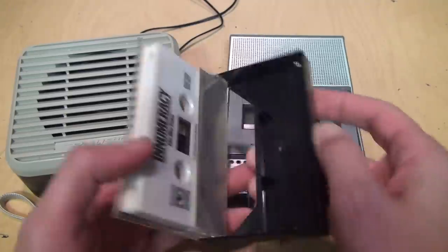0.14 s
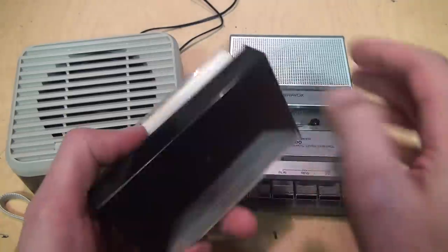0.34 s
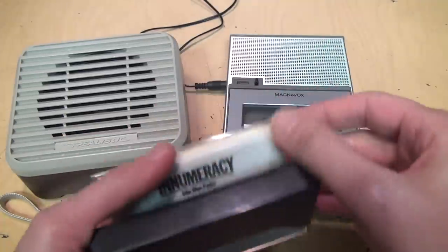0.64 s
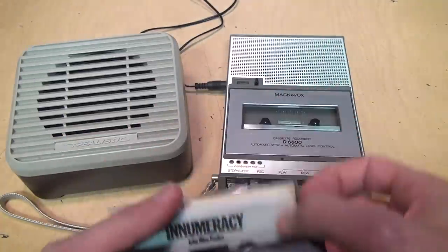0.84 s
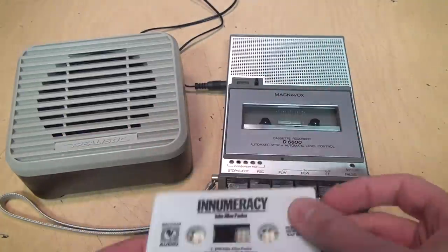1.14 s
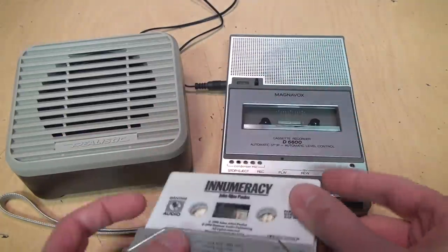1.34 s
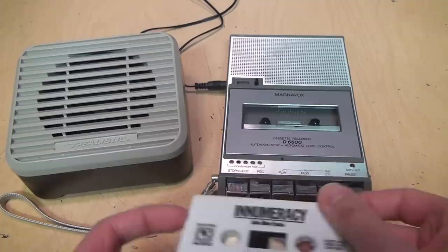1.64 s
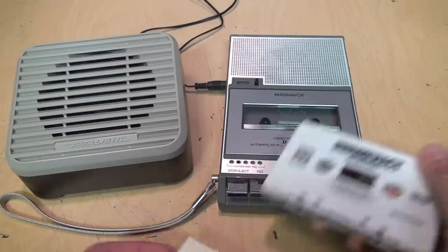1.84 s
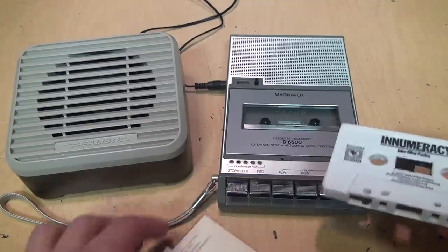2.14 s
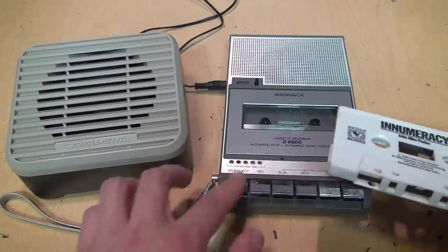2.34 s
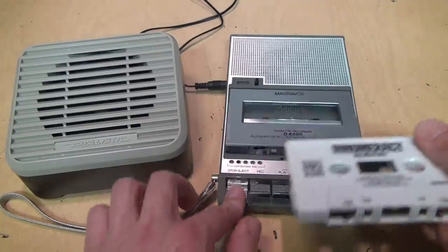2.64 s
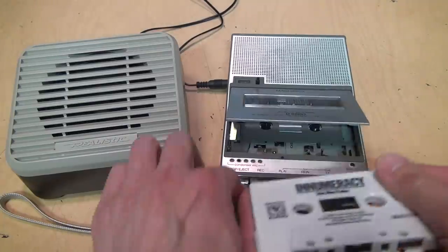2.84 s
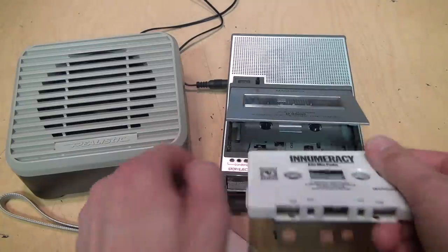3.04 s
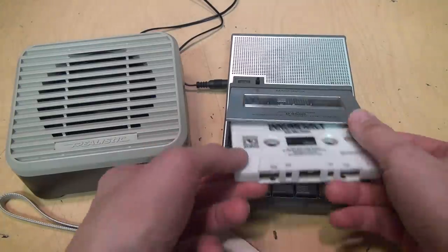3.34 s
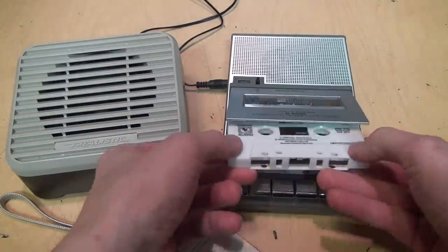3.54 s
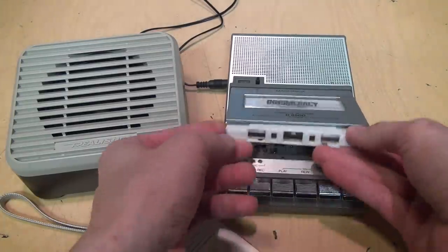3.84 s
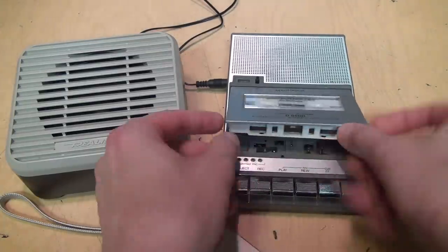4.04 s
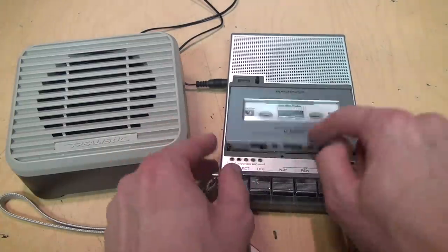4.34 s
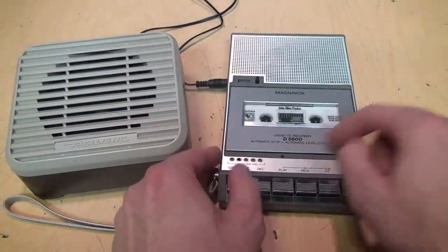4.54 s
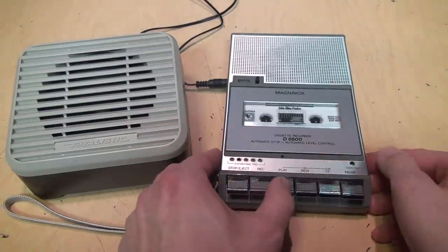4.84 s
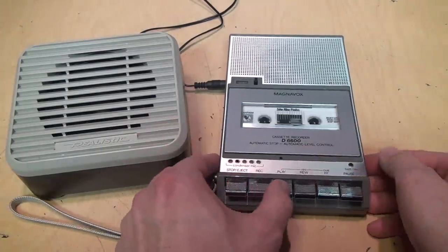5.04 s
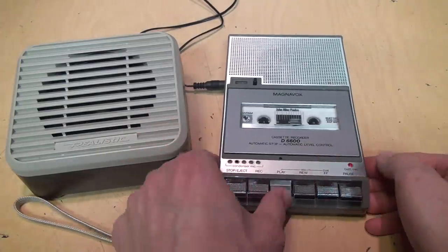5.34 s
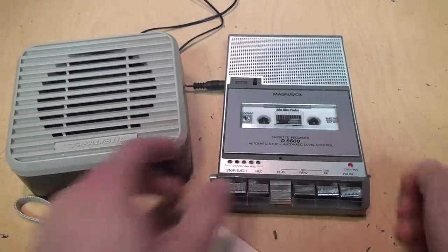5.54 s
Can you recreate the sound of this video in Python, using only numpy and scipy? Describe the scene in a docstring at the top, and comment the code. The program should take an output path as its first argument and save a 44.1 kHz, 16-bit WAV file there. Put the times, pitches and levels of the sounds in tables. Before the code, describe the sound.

A plastic cassette rattles out of its case, the case clatters onto a table, then a player is opened, loaded, shut and a key pressed.

```python
"""Hands click and rattle a tape cassette out of its plastic case, then drop the case on the table. They open a
portable deck, clatter the cassette in, shut the lid and press a key; springs in the deck ring on faintly.
Contacts are lumpy noise bursts through shell resonances, slides are grainy noise with dry ticks on top,
springs and table pushes are dying sines. Filtered noise and two low tones make the air of a small quiet
room from start to end, heard by a microphone close above the table."""
import sys
import numpy as np
from scipy import signal
from scipy.fft import rfft, irfft, next_fast_len
from scipy.io import wavfile
from scipy.ndimage import uniform_filter1d, map_coordinates

SR = 44100
rng = np.random.default_rng(int(sys.argv[2]) if len(sys.argv) > 2 else 0)


def waveform_to_disk(signal):
    """Save audio, clipped to [-1, 1], as 16-bit WAV at the path in sys.argv[1]."""
    frames = np.transpose(np.atleast_2d(signal))
    scaled = np.clip(frames, -1, 1) * 32767
    samples = np.round(scaled).astype(np.int16)
    wavfile.write(sys.argv[1], SR, samples)


N = 250247

# resonances of the thin case and cassette shells: [f/Hz, width/Hz, relative level/dB]
CASE_MODES = [(308, 280, -14), (1263, 368, 3), (1680, 370, 5), (2326, 870, 2.5), (3550, 790, 2),
              (4410, 700, 0.5), (5880, 1200, -6)]
# resonances of the deck's housing and lid: [f/Hz, width/Hz, relative level/dB]
DECK_MODES = [(223, 33, 8.5), (290, 37, 4.5), (808, 90, 17.5), (1120, 150, 17), (1520, 1140, 16),
              (1998, 704, 18.5), (3100, 4000, 11), (4647, 830, 16.5), (5000, 890, 10.5)]
# plastic and fingers sliding on plastic: [start/s, end/s, level/dB]
SLIDES = [(0, 0.038, -34), (0.11, 0.403, -45), (0.43, 0.51, -48.5), (0.564, 0.63, -49), (0.666, 1.121, -58),
          (0.8, 0.827, -45.5), (0.916, 0.956, -42), (0.967, 1.007, -48), (1.094, 1.165, -40.5),
          (1.159, 1.345, -42.5), (1.346, 1.426, -53), (1.432, 1.47, -36.5), (1.506, 1.67, -39),
          (1.654, 1.839, -37.5), (1.831, 1.93, -51.5), (1.921, 1.992, -41.5), (1.994, 2.108, -39.5),
          (2.092, 2.272, -32.5), (2.492, 2.616, -58), (2.691, 2.854, -53.5), (2.961, 3.108, -64.5),
          (3.269, 3.34, -61.5), (3.425, 3.473, -57.5), (3.564, 3.78, -53), (3.775, 3.87, -50),
          (3.899, 4.013, -37), (3.994, 4.109, -49.5), (4.024, 4.06, -36), (4.223, 4.287, -64),
          (4.375, 4.432, -21.5), (4.402, 4.491, -49), (4.948, 5.107, -65.5), (5.206, 5.308, -44),
          (5.44, 5.532, -47.5), (5.547, 5.602, -50.5)]
CASE_DOWN_S = 2.4  # from here on the hands work at the deck


def amp(db):
    """Decibels to an amplitude factor."""
    return 10 ** (np.asarray(db) / 20)


def unit(x):
    """Scale to an rms of one."""
    return x / np.sqrt(np.mean(x ** 2) + 1e-20)


def peak_unit(x):
    """Scale to a peak of one."""
    return x / np.abs(x).max()


def along(points, hz):
    """Interpolate (f/Hz, value) points on a log frequency axis."""
    f, v = np.transpose(points)
    return np.interp(np.log(hz + 1), np.log(f + 1), v)


def filtered(x, response):
    """Multiply the spectrum of x by a response of frequency."""
    m = next_fast_len(x.shape[-1] + 4096)
    spectrum = rfft(x, m) * response(np.fft.rfftfreq(m, 1 / SR))
    return irfft(spectrum, m)[..., :x.shape[-1]]


def body(modes):
    """The causal response of a few resonances, summed with alternating sign."""
    def response(f):
        total = 0
        for k, (centre, width, db) in enumerate(modes):
            damping = 1j * f * width
            total = total + (-1) ** k * amp(db) * damping / (centre * centre - f * f + damping)
        return total
    return response


def edge(hz):
    """The brittle treble of hard edges."""
    # brightness of sharp plastic edges: [f/Hz, level/dB]
    edge_curve = [(600, -79), (3000, -11), (5000, -8), (7500, -6.5), (11000, -12), (15000, -25.5)]
    return amp(along(edge_curve, hz))


def favoured(modes, centre_hz):
    """The place of contact favours the modes near one pitch, a little differently each time."""
    struck = []
    for hz, width, level in modes:
        octaves = np.log2(hz / centre_hz)
        lift_db = 9 * np.exp(-(octaves / .5) ** 2)
        struck.append((hz, width, level + lift_db + rng.normal(0, 2)))
    return struck


def hits(rows, modes, t60):
    """Each contact is a lumpy burst of micro-impacts dying away, heard through the shell and off the edges."""
    graze, graze_s = 0.22, .0015  # the touch before a contact: size, rise time constant
    edge_t60_s = 0.083  # extra decay that makes the edges die sooner
    out, lead = np.zeros(N + SR), SR // 250
    t = (np.arange(SR // 5) - lead) / SR
    # surfaces graze for an instant before they meet squarely
    shape = np.where(t < 0, graze * np.exp(t / graze_s), amp(-60 * t / max(t60, graze_s)))
    for s, db, centre_hz, edge_db in rows:
        lumps = amp(2.5 * map_coordinates(rng.standard_normal(200), [(t + .01) * 500]))
        shell_burst, edge_burst = rng.standard_normal((2, len(t))) * lumps * shape
        response = body(favoured(modes, centre_hz))
        # two gentle low-passes at 5 kHz leave the top treble to the edges
        shell = filtered(shell_burst, lambda f: response(f) / (1 + 1j * f / 5000) ** 2)
        edges = filtered(edge_burst * amp(-60 * t / edge_t60_s), edge)
        sound = peak_unit(shell) + amp(edge_db) * peak_unit(edges)
        out[round(s * SR):][:len(t)] += amp(db) * sound
    return out[lead:][:N]


def air():
    """Room tone: steady noise of one colour, independent in mid and side."""
    # colour of the room tone: [f/Hz, relative level/dB]
    air_colour = [(47, -28), (80, -2), (331, -8), (718, -8.5), (839, -3), (1200, -3), (1670, -9.5),
                  (2490, -12), (9400, -20.5), (16000, -22)]
    level_db = -61  # rms, before the side filter and the microphone
    noise = rng.standard_normal((2, N))
    return amp(level_db) * unit(filtered(noise, lambda hz: amp(along(air_colour, hz))))


def hum():
    """A faint low drone in the building: two sines that throb together."""
    # drone tones: [f/Hz, rms level before the microphone/dB]
    drone_tones = [(50.15, -71), (59.1, -74)]
    t = np.arange(N) / SR
    return sum(np.sqrt(2) * amp(db) * np.sin(2 * np.pi * (hz * t + rng.random())) for hz, db in drone_tones)


def room(x):
    """Noise as the room's answer, each frequency dying at its own speed."""
    # reverberation: [f/Hz, t60/s]
    decay_times = [(300, 0.28), (2000, 0.14), (6000, 0.095), (12000, 0.084)]
    hz, t, z = signal.stft(rng.standard_normal(SR // 3), SR, nperseg=256)
    decay = amp(-60 * t / along(decay_times, hz)[:, None])
    tail = signal.istft(z * decay, SR, nperseg=256)[1]
    delayed = np.pad(x, (150, 0))  # samples before the first reflection
    return signal.fftconvolve(delayed, tail / np.linalg.norm(tail))[:N]


def patchy(x, depth_db):
    """The grip keeps changing, so bands of colour come and go."""
    z = signal.stft(x, nperseg=256)[2]
    over_pitch = uniform_filter1d(rng.standard_normal(z.shape), size=4, axis=0)
    field = uniform_filter1d(over_pitch, size=9, axis=1)
    return signal.istft(z * amp(depth_db * unit(field)), nperseg=256)[1][:len(x)]


def rub():
    """Each slide swells and fades, catching in uneven grains that excite whichever body is in the hands."""
    # edge level relative to the shell, by the body in the hands: [level/dB]
    rub_edges = {"case": -3.5, "deck": -13.5}
    out = np.zeros(N + SR)
    for start, end, db in SLIDES:
        at_case = start < CASE_DOWN_S
        modes = CASE_MODES if at_case else DECK_MODES
        edge_db = rub_edges["case" if at_case else "deck"]
        u = np.linspace(0, 1, round((end - start) * SR))
        catches = amp(3.5 * map_coordinates(rng.standard_normal(200), [u * (end - start) * 200]))
        swell = np.sin(np.pi * u) ** .9
        grains = rng.standard_normal((2, SR // 2))[:, :len(u)] * catches * swell
        shell = filtered(grains[0], body(modes))
        edges = filtered(grains[1], edge)
        out[round(start * SR):][:len(u)] += amp(db) * (unit(shell) + amp(edge_db) * unit(edges))
    return patchy(out[:N], depth_db=3)


def ticks():
    """Small catches let go as fine dry ticks through every slide, louder where the slide is louder."""
    ticks_per_s, tick_t60_s = 22, 0.011
    tick_db, spread_db = 12, 2.5  # offset from the slide's level, scatter of sizes
    case_rows, deck_rows = [], []
    for start, end, db in SLIDES:
        rows = case_rows if start < CASE_DOWN_S else deck_rows
        draws = rng.random((12, 4))[:round(ticks_per_s * (end - start))]
        for where, size, pitch, hard in draws:
            s = start + (0.089 + .8 * where) * (end - start)
            level_db = db + tick_db - spread_db * np.log(size + 0.033)  # a few stand out
            rows.append((s, level_db, 1100 * 4 ** pitch, -14 + 16 * hard))
    return hits(case_rows, CASE_MODES, tick_t60_s) + hits(deck_rows, DECK_MODES, tick_t60_s)


def case_rattle():
    """The cassette knocks in the hand-held case: short bursts through thin shells."""
    # knocks: [t/s, shell peak level/dB, favoured f/Hz, edge level relative to shell/dB]
    case_knocks = [(0.0044, -9.5, 5500, 4), (0.0294, -24, 1349, -5.5), (0.0444, -17.5, 3270, -14),
                   (0.161, -21.5, 1160, -2), (0.2054, -11, 1440, 5.5), (0.2443, -24, 1710, 7),
                   (0.2648, -10.5, 3400, -9.5), (0.2843, -19.5, 1600, -6.5), (0.3012, -23, 3020, -16),
                   (0.3164, -23, 1460, -10), (0.3686, -8, 2610, -10), (0.4364, -26, 1840, -5),
                   (0.4823, -16, 1600, -19.5), (0.5836, -19.5, 1290, -8.5), (0.6464, -25, 2420, 15.5),
                   (0.6594, -14, 1800, -4), (0.6696, -19, 2370, -7.5), (0.6834, -25, 1720, -5.5),
                   (0.7746, -19.5, 1180, -2), (0.8624, -30, 1840, -24), (0.8964, -28.5, 1190, -13.5),
                   (1.0256, -31.5, 1330, -2.5), (1.1463, -15.5, 1470, 11.5), (1.1752, -20.5, 1280, -3),
                   (1.1992, -6, 3300, -5.5), (1.2144, -17, 1480, -23.5), (1.2294, -23.5, 1440, -12.5),
                   (1.261, -9.5, 1750, -9.5), (1.3024, -15.5, 4600, 5.5), (1.3518, -25, 1320, -27.5),
                   (1.4292, -16, 1570, -1.5), (1.4546, -20.5, 1250, -12), (1.5204, -29.5, 1700, -26.5),
                   (1.5698, -21, 1250, -6.5), (1.5998, -14.5, 1450, -10.5), (1.6077, -16, 1830, -28.5),
                   (1.6277, -19.5, 4130, -5.5), (1.6541, -13.5, 1780, -13.5), (1.8891, -33, 3640, 4.5),
                   (1.9305, -7.5, 2380, -3)]
    return hits(case_knocks, CASE_MODES, t60=0.02)


def thumps():
    """The table top gives a few low cycles under each firm push."""
    # table top modes: [f/Hz, cycles until 60 dB down]
    table_modes = [(100, 6.9), (207, 41), (355, 7)]
    # pushes on the table: [t/s, level of each table mode in turn/dB]
    push_levels = [(0.901, -60, -58, -26), (1.193, -45, -53.5, -32), (2.739, -33, -32, -42.5),
                   (4.425, -29, -33.5, -32), (4.716, -43.5, -40.5, -44), (5.25, -33, -31.5, -1.5),
                   (5.452, -40.5, -57, -50)]
    out, t = np.zeros(N + SR), np.arange(SR // 3) / SR
    for s, *push_db in push_levels:
        ring = 0
        for db, (hz, cycles) in zip(push_db, table_modes):
            ring = ring + amp(db - 60 * t * hz / cycles) * np.sin(2 * np.pi * hz * t)
        out[round(s * SR):][:len(t)] += ring * (1 - np.exp(-t / 0.0018))  # soft onset
    return out[:N]


def case_drop():
    """The empty case lands on the table and bounces: longer chatter through the thin shells."""
    # landings: [t/s, shell peak level/dB, favoured f/Hz, edge level relative to shell/dB]
    case_landings = [(1.9814, -5.5, 2270, 0.5), (2.0976, -6.5, 3200, 2.5), (2.1311, -6, 3600, -3),
                     (2.1675, -7, 2620, 1.5), (2.1934, -11, 2860, -3.5), (2.2084, -25, 2280, 17)]
    return hits(case_landings, CASE_MODES, t60=0.072)


def deck_handling():
    """Lid, keys and fingers knock on the deck: bursts through its housing."""
    # knocks: [t/s, shell peak level/dB, favoured f/Hz, edge level relative to shell/dB]
    deck_knocks = [(2.522, -39.5, 810, -2), (2.547, -18.5, 790, -6.5), (2.655, -45.5, 1190, -2.5),
                   (2.718, -17.5, 1160, -3.5), (2.733, 0, 1274, -24.5), (2.745, -7, 1260, -28),
                   (2.771, -9.5, 1370, -9), (2.782, -13.5, 720, -17), (2.805, -19.5, 676, -19.5),
                   (2.83, -20, 762, -29.5), (2.946, -25, 3280, -12.5), (2.961, -14.5, 4930, 3.5),
                   (2.987, -21.5, 1420, -1.5), (4.137, -31.5, 1310, -3.5), (4.149, -20.5, 3955, -2),
                   (4.383, -12, 4370, 5), (4.374, -24, 818, -12.5), (4.396, -20, 752, -8),
                   (4.411, -14.5, 1504, -18), (4.419, -5.5, 830, -3.5), (4.552, -36.5, 826, -8),
                   (4.577, -41, 1200, -30), (4.712, -25, 508, -18), (4.842, -35.5, 750, -27),
                   (5.216, -25, 1535, 1.5), (5.237, -26, 1232, 1), (5.25, -11.5, 1270, 0),
                   (5.26, -21.5, 1260, -4.5), (5.33, -32.5, 2190, 2.5), (5.349, -23, 3200, -6),
                   (5.391, -20, 1284, -0.5), (5.434, -11.5, 4200, -3), (5.449, -23.5, 4700, -3),
                   (5.485, -21, 1340, -22.5), (5.548, -29, 887, -14), (5.562, -28.5, 1495, -2)]
    return hits(deck_knocks, DECK_MODES, t60=0.031)


def spring(modes, shakes, swell):
    """Steel springs ring on as dying sines, long after the plastic has gone quiet."""
    out, t = np.zeros(N + 2 * SR), np.arange(2 * SR) / SR
    for s, *jolt_db in shakes:
        ring = 0
        for db, (hz, level, t60) in zip(jolt_db, modes):
            tone = np.sin(2 * np.pi * (hz * t + rng.random()))
            ring = ring + amp(db + level - 60 * t / t60) * tone
        out[round(s * SR):][:len(t)] = ring * (1 - np.exp(-t / swell))  # a new jolt stops the old ringing
    return out[:N]


def key_spring():
    """One jolt sets the key springs ringing, with a short fade-in."""
    # spring modes: [f/Hz, relative level/dB, t60/s]
    key_modes = [(797, -2, 3), (1410, -2, 1.2), (1604, -7, 1.7), (2040, -2, .42), (2719, -9, 1.1),
                 (3397, -8, 2), (7343, 4, .26)]
    jolt_s, jolt_db = 2.965, -58  # the same gain for every mode
    return spring(key_modes, [(jolt_s, *[jolt_db] * len(key_modes))], swell=.02)


def cassette_loading():
    """The cassette clatters into the lid's guides: bursts through the deck's housing."""
    # knocks: [t/s, shell peak level/dB, favoured f/Hz, edge level relative to shell/dB]
    loading_knocks = [(3.306, -37, 3200, -6.5), (3.316, -37.5, 900, 2), (3.335, -37, 2950, -11),
                      (3.36, -10, 910, -3), (3.386, -21.5, 1540, -20), (3.486, -18, 1400, 2.5),
                      (3.496, -19, 1400, -3.5), (3.512, -33, 1310, 3.5), (3.544, -13.5, 1070, -11),
                      (3.59, -20.5, 1480, -16), (3.672, -14, 670, -9.5), (3.689, -32, 720, 9.5),
                      (3.716, -18, 780, -26), (3.84, -23, 1150, -14.5), (3.854, -22, 870, -24.5),
                      (3.923, -19, 837, 2), (3.939, -6, 3080, -1.5), (3.955, -8.5, 3050, 3),
                      (3.969, -8.5, 3770, -17.5), (4.03, -24.5, 1500, -5.5)]
    return hits(loading_knocks, DECK_MODES, t60=0.045)


def lid_spring():
    """Jolts of the lid set its spring ringing on a close pair of tones, heard to fade in after each knock."""
    # spring modes: [f/Hz, relative level/dB, t60/s]
    lid_modes = [(759, -39, 2.3), (824, -42, 2.5)]
    # jolts: [t/s, gain of each mode in turn/dB]
    lid_jolts = [(4.43, 0, -8), (5.26, -25, -9), (5.45, -25, -4)]
    return spring(lid_modes, lid_jolts, swell=.14)


def scene():
    """Nearly mono: reflections differ between close microphone ports, the deck sits a little to the right."""
    # gain of the side signal: [f/Hz, gain/dB]
    side_gain = [(100, -31.5), (1000, -20.5), (4000, -9), (12000, -12)]
    deck = deck_handling() + cassette_loading()
    near = case_rattle() + case_drop() + deck + rub() + ticks()
    springs = key_spring() + lid_spring()
    air_mid, air_side = air()
    mid = near + amp(-11.0) * room(near) + springs + thumps() + air_mid + hum()
    # a second, independent room answer; minus moves the deck to the right
    wide = 0.29 * room(near) - .4 * deck + air_side
    side = filtered(wide, lambda hz: amp(along(side_gain, hz)))
    return np.array([mid + side, mid - side])


def record(dry):
    """The microphone loses the deep bass and rounds the highest peaks; nothing is kept above the band limit."""
    ceiling, bass_hz, top_hz = .85, 25, 16200
    soft = dry / (1 + np.abs(dry / ceiling) ** 4) ** (1 / 4)
    return filtered(soft, lambda hz: (1j * hz / (bass_hz + 1j * hz)) ** 2 * (hz < top_hz))


dry = scene()
out = record(dry)
waveform_to_disk(out)
```